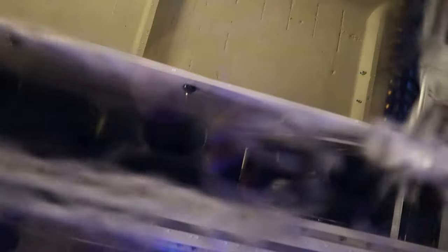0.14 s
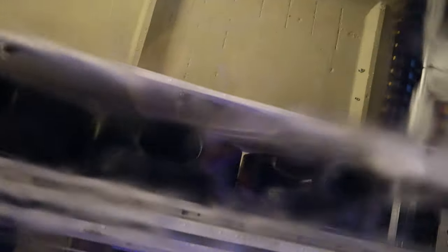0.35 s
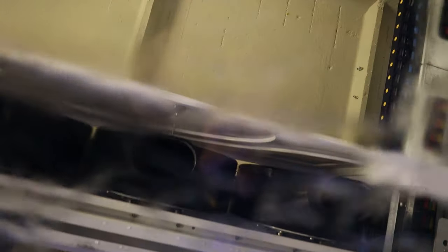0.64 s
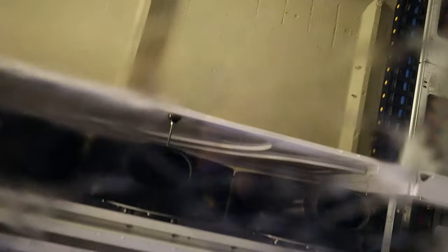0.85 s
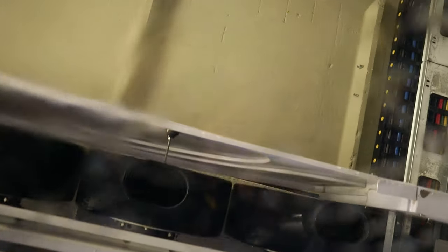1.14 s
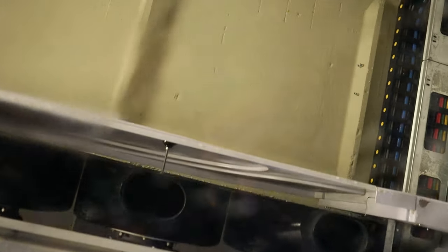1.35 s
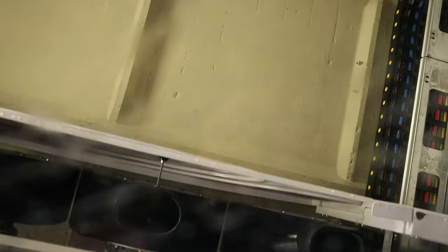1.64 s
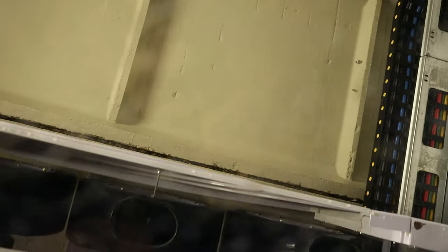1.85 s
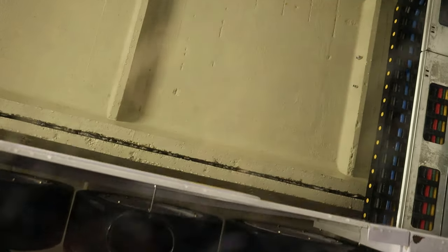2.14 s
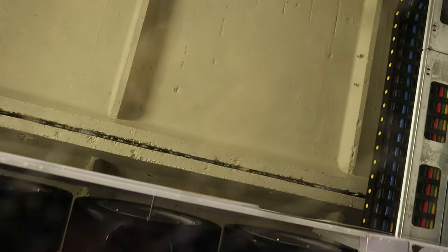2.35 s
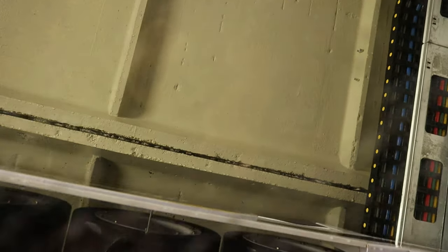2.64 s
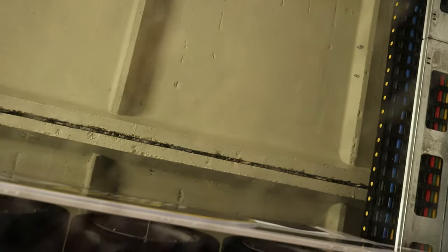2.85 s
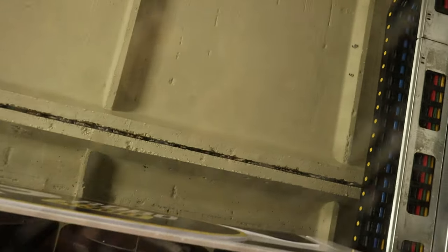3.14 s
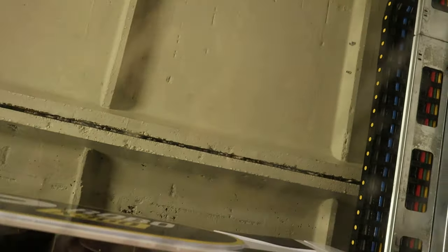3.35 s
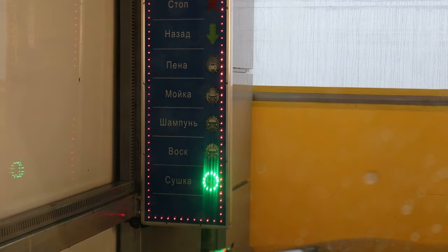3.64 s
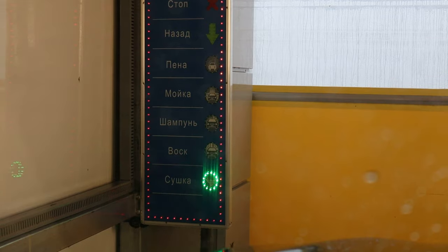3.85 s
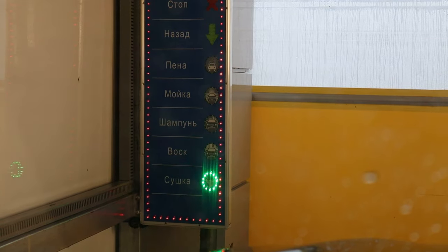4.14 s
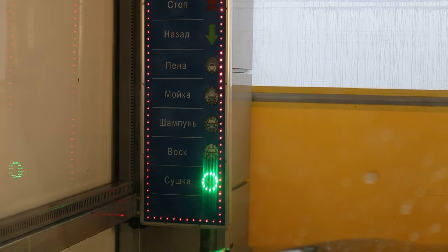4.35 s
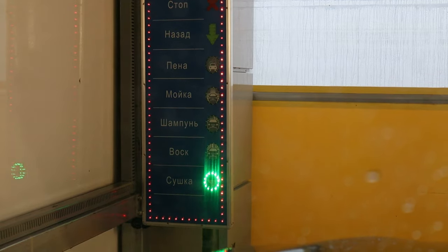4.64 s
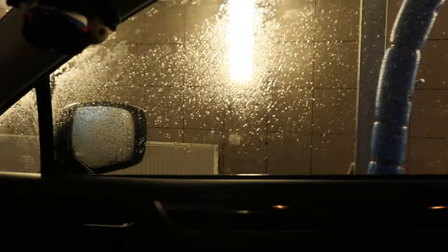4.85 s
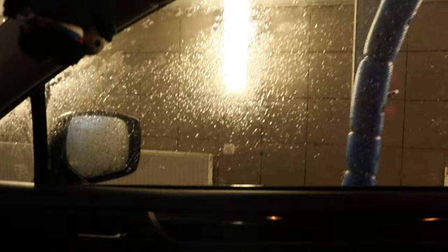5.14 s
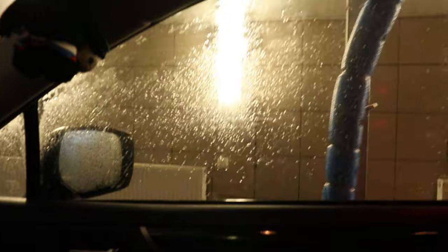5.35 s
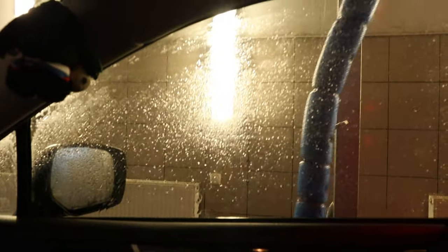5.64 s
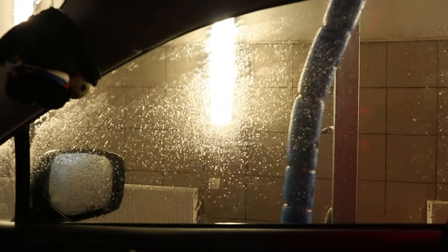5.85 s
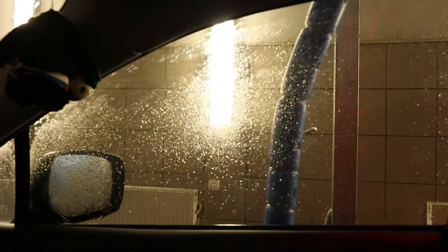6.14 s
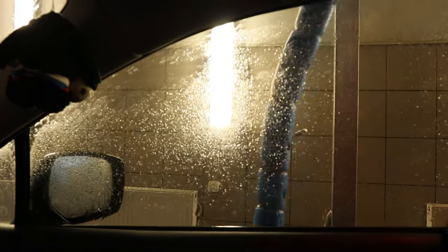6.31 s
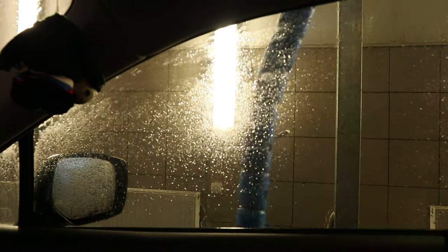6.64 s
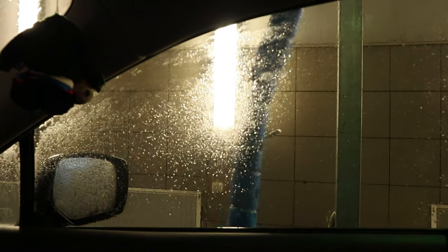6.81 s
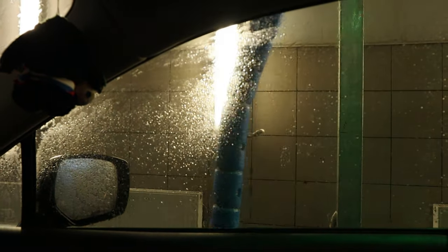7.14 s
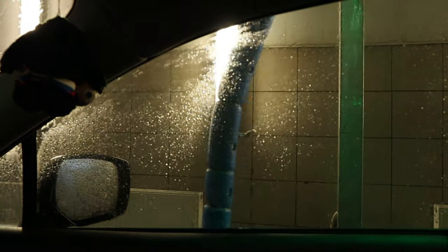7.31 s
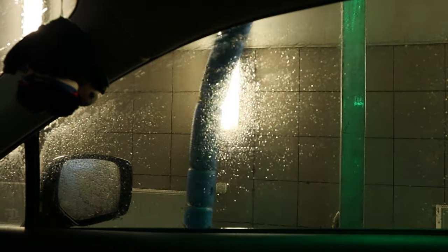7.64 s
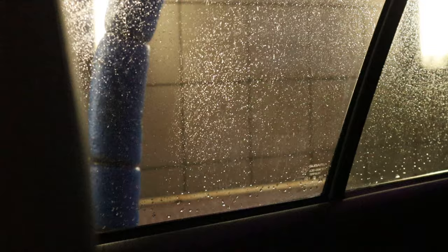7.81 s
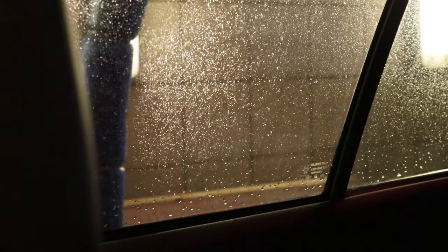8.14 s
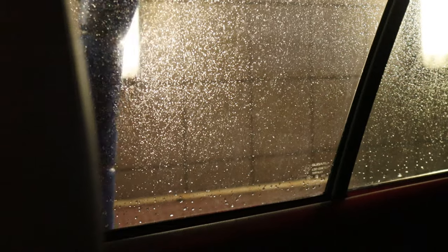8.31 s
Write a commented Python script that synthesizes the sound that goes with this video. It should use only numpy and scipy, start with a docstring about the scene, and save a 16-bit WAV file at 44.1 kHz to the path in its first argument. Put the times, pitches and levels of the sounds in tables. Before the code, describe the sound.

From 0 s, large car-wash dryers blow over a closed car, heard from within the cabin. A deep, turbulent boom dominates, slightly strongest at the very start, with a rumbling drone from roof, doors and glass. Above it lies a quiet, muffled hiss of air jets, a faint wavering fan whine near 2 kHz and soft, fuzzy whistles. Around 1.75 s the hiss grows briefly louder and duller; the lowest bass swells near 3.3 s. At about 4 s a very short fade moves to another seat, with similar roar but slightly different colour, and the hiss brightens gently around 4.7 s. The rush continues steadily, with small gusts, until 7.86 s, when it cuts with a click and a gap of about 0.02 s. The roar returns abruptly, with weaker deep boom and stronger panel and roof drone, a short bright hiss swell near 8.35 s, and continues to the end at about 8.5 s.

```python
"""Wash bay, microphone inside a car's cabin while large blowers dry it; heard from three seats in turn.
At the first seat turbulent air booms in the cabin modes and drones in roof, doors and glass, as shaped noise;
jet hiss (broad noise), a fan whine (wavering tone) and whistles (narrow noise) leak through the glass.
After 4 s this fades into the second seat; near 7.9 s that cuts off with a click and a short gap.
Then the third seat's boom and drone return at once, its hiss and the fan tones a little more slowly."""
import sys
import numpy as np
from scipy import signal
from scipy.io import wavfile
from scipy.ndimage import uniform_filter1d

SR = 44100
rng = np.random.default_rng(int(sys.argv[2]) if len(sys.argv) > 2 else 0)


def output_pcm(signal):
    """Save a mono or channel-first signal as 16-bit PCM at the path in sys.argv[1].

    Samples are clipped to [-1, 1] before scaling.
    """
    pcm = np.clip(np.atleast_2d(signal).T, -1, 1) * 32767
    wavfile.write(sys.argv[1], SR, np.round(pcm).astype(np.int16))


def to_linear_factor(level_db):
    """Convert decibel levels (scalar or array-like) to linear amplitude factors."""
    exponent = np.asarray(level_db, float) / 20
    return 10 ** exponent


N = 373527
T = np.arange(N) / SR  # time of every sample, s


def evened(x):
    """Scales to rms 1."""
    return x / np.sqrt(np.mean(x ** 2) + 1e-20)


def curve(rows):
    """Second column of a table at every sample, joined by straight lines over the times in the first."""
    rows = np.asarray(rows)
    return np.interp(T, rows[:, 0], rows[:, 1])


def ramp(start_s, end_s):
    """Rises from 0 to 1 between two times."""
    return np.clip((T - start_s) / max(end_s - start_s, 1e-4), 0, 1)


def bell(centre_s, width_s):
    """Rises to 1 at one moment and falls again."""
    return np.exp(-((T - centre_s) / width_s) ** 2)


def modes(table, seat):
    """Gain against frequency of steep resonances that add in power; widths lie between -6 dB points."""
    def gain(hz):
        power = 0
        for f, width, *db in table:
            offset = 2 * (hz - f) / width
            power = power + to_linear_factor(2 * db[seat]) / (1 + offset ** 2) ** 2
        return np.sqrt(power)
    return gain


def spectrum(points):
    """Gain against frequency from points joined on a log axis."""
    f, db = np.transpose(points)
    return lambda hz: to_linear_factor(np.interp(np.log(hz + 1), np.log(f + 1), db))


def turbulence(gain, size, patchy_db, gusty_db, tilt=None):
    """Noise of rms 1: random short-time spectra with drifting patches and gusts shared by all frequencies."""
    hop = size // 4
    frames, hz = N // hop + 5, np.fft.rfftfreq(size, 1 / SR)
    real, imaginary, patches = rng.standard_normal((frames, len(hz), 3)).T
    patches = evened(uniform_filter1d(uniform_filter1d(patches, 8, 0), 16, 1))
    starts = np.arange(frames) * hop
    gusts = 0
    for f in np.geomspace(3, 20, 24):
        gusts = gusts + np.sin(2 * np.pi * (f * starts / SR + rng.random())) / np.sqrt(f)
    # gusts show most in the treble
    field_db = patchy_db * patches + gusty_db * evened(gusts) * (1 + hz[:, None] / 7000)
    if tilt is not None:  # dB per octave, turning about 2 kHz
        octaves = np.log2((hz[:, None] + 1) / 2000)
        field_db += octaves * tilt[np.minimum(starts, N - 1)]
    z = (real + 1j * imaginary) * gain(hz)[:, None] * to_linear_factor(field_db)
    return evened(signal.istft(z, nperseg=size, noverlap=size - hop)[1][:N])


# air modes of the cabin: f/Hz, width/Hz, relative level/dB at seat 1, 2, 3
CABIN_MODES = [(50, 27, -10, -5, -14), (81, 40, -3, -8.5, -17.5), (112.2, 39.5, -2.5, -2.5, -7.5),
               (144, 30, -1.5, -3, -12.5), (177, 26.5, -6, -8.5, -11), (202.2, 37.6, -5.5, -10, -11)]
# cabin boom as the blowers travel: t/s, level/dB
BOOM_LEVEL = [(0, -15), (.15, -21), (.6, -20), (1.2, -22), (1.55, -19.5), (1.85, -22.5), (2.5, -21),
              (3.4, -23.5), (4, -23), (4.4, -24.5), (5.05, -24.5), (5.5, -23.5), (6.3, -23.5), (6.6, -22.5),
              (7.2, -24.5), (7.55, -22.5), (8.47, -22)]


def boom(seat):
    """The blast shakes the shell and the cabin air answers in its modes; the lowest swells once."""
    low_cut_hz = 38  # the microphone loses the deepest bass

    def heard(table):
        return lambda hz: modes(table, seat)(hz) / np.sqrt(1 + (low_cut_hz / (hz + 1)) ** 14)

    deep = turbulence(heard(CABIN_MODES[:1]), size=8192, patchy_db=0.0, gusty_db=0.5)
    swell = to_linear_factor(-29.5) * bell(centre_s=3.3, width_s=0.91)
    air = turbulence(heard(CABIN_MODES), size=8192, patchy_db=0.5, gusty_db=0.33)
    return swell * deep + to_linear_factor(curve(BOOM_LEVEL)) * air


# roof modes: f/Hz, width/Hz, relative level/dB at seat 1, 2, 3
ROOF_MODES = [(237, 73, -0.5, -5, -1.7), (302.5, 55, -4.5, -6, -4), (335.5, 27.2, -3, -1.5, -2.5)]
# door and glass modes: f/Hz, width/Hz, relative level/dB at seat 1, 2, 3
PANEL_MODES = [(396.7, 61, -1.5, -3, 0), (460.6, 45, -0.5, -1, -5), (527, 46, -3, -6, -8),
               (584.3, 47, -3, -6, -6.5), (655, 55, -9.5, -8, -9), (746, 124, -8.5, -10.5, -14.5)]
# one row a seat, also read by hiss(): middle t/s, roof drone level/dB, its drift/(dB per s),
# door and glass drone level/dB, its drift/(dB per s), hiss level/dB
SEAT_LEVELS = [(2, -31.5, -1.5, -40, 0.47, -45), (6, -32.5, -.5, -38, -0.5, -45.5),
               (8.2, -28, -1, -34.5, 4, -46)]


def drone(seat):
    """Eddies drum on the roof, and on doors and glass, which ring in their modes."""
    middle_s, roof_db, roof_drift, door_db, door_drift, _ = SEAT_LEVELS[seat]
    since = np.clip(T - middle_s, -3, 3)  # s
    settling_db = 6 * np.exp(-T / 0.077)  # the roof begins louder and settles
    roof = turbulence(modes(ROOF_MODES, seat), size=2048, patchy_db=-0.1, gusty_db=0.5)
    roof = to_linear_factor(roof_db + roof_drift * since + settling_db) * roof
    lowest = turbulence(modes(PANEL_MODES[:1], seat), size=2048, patchy_db=1.5, gusty_db=-0.5)
    swell = to_linear_factor(-42) * bell(centre_s=4.52, width_s=1)  # the lowest door mode swells once
    panels = turbulence(modes(PANEL_MODES, seat), size=2048, patchy_db=1.0, gusty_db=0.3)
    return roof + swell * lowest + to_linear_factor(door_db + door_drift * since) * panels


# hiss through the glass, one list a seat: f/Hz, relative level/dB
HISS_SPECTRA = [
    [(550, -44.5), (850, -5.5), (1100, -8), (1580, -11.5), (2300, -15.5), (3000, -15), (3800, -15.5),
     (4300, -19), (7200, -26.5), (8600, -37), (9500, -43.5), (11500, -48), (13500, -55), (15000, -68)],
    [(550, -52.5), (850, -1.5), (1100, -6), (1580, -9.5), (2100, -11.5), (2700, -16), (3200, -14.5),
     (3900, -16.5), (5000, -18), (5400, -23), (5950, -21), (6500, -24.5), (7300, -24.5), (8600, -34.5),
     (10000, -44), (12500, -52.5), (15000, -74)],
    [(550, -18), (850, 2), (1100, -1.5), (1580, -6.5), (2300, -9), (3100, -11), (3900, -10.5), (4450, -12),
     (4750, -16), (6500, -21), (7600, -26), (8800, -36), (10000, -42), (14500, -68)],
]
# change of the hiss tilt, one value a seat: drift/(dB per octave per s)
TILT_DRIFT = [0, -.1, 0]


def hiss(seat):
    """The jets' own noise, dulled by the glass; for a moment it is louder and duller."""
    middle_s, hiss_db = SEAT_LEVELS[seat][0], SEAT_LEVELS[seat][-1]
    dull = bell(centre_s=1.75, width_s=0.32)
    tilt = 0.4 + TILT_DRIFT[seat] * (T - middle_s) - 1.1 * dull  # dB per octave
    jets = turbulence(spectrum(HISS_SPECTRA[seat]), size=512, patchy_db=0.68, gusty_db=0.18, tilt=tilt)
    return to_linear_factor(hiss_db + 1.3 * dull) * jets


# blade tone of the nearest fan, before its flutter: t/s, level/dB
WHINE_LEVEL = [(0, -61), (.25, -65), (.8, -64), (1.1, -64), (1.22, -58), (1.35, -62), (1.6, -58.5),
               (1.8, -64), (1.95, -59), (2.15, -66), (2.3, -55.5), (2.42, -65), (2.55, -62), (2.7, -70),
               (3.05, -66), (3.23, -55), (3.4, -60), (3.62, -66), (3.82, -52), (3.93, -57), (4.1, -61),
               (4.25, -59), (4.35, -63), (4.5, -57), (4.6, -60), (4.72, -56), (4.85, -58), (4.97, -55),
               (5.05, -60), (5.15, -56), (5.28, -63), (5.75, -61), (5.85, -66), (5.95, -58), (6.15, -63),
               (6.27, -57), (6.45, -61), (6.75, -59.5), (6.87, -65), (7.05, -60), (7.3, -62), (7.45, -58),
               (7.55, -64), (7.7, -59), (7.85, -60), (7.9, -68), (8.12, -68), (8.22, -58), (8.47, -61)]


def whine():
    """Blades pass the housing; the moving air makes the tone waver in phase and level."""
    whine_hz, octave_db = 1966, -15  # blade tone, and its second harmonic against it
    phase_rad, flutter_db = 0.85, 2.0  # rms of the two waverings
    drift, flutter = (evened(uniform_filter1d(uniform_filter1d(v, size=1400), size=1400))
                      for v in rng.standard_normal((2, N)))
    phase = 2 * np.pi * whine_hz * T + phase_rad * drift
    tone = np.sin(phase) + to_linear_factor(octave_db) * np.sin(2 * phase)
    return np.sqrt(2) * to_linear_factor(curve(WHINE_LEVEL) + flutter_db * flutter) * tone


# fuzzy whistles of the other fans: f/Hz, width/Hz
WHISTLE_BANDS = [(1676, 11), (1728, 45), (2010, 60)]
# one peak for each whistle: peak t/s, level/dB, rise/(dB per s), fall/(dB per s)
WHISTLE_PEAK_LEVELS = [(.1, -62.5, 1, .8), (1.9, -61, 1.0, 1.8), (7.75, -57, 6, 60)]
# brief swells added to the middle whistle: t/s, width/s, level/dB
MIDDLE_SWELLS = [(.1, .15, 6), (.42, .05, 4), (.7, .1, 3), (1.1, .08, 5), (1.55, .1, 3), (1.88, .06, 8),
                 (2.55, .05, 3), (3.08, .08, 4), (3.52, .06, 3)]


def whistles():
    """Narrow noise where distant blades pass."""
    bands = [turbulence(modes([(hz, width, 0)], seat=0), size=16384, patchy_db=0, gusty_db=0)
             for hz, width in WHISTLE_BANDS]
    swell_db = sum(db * bell(s, width) for s, width, db in MIDDLE_SWELLS)
    bands[1] = bands[1] * to_linear_factor(swell_db)
    total = 0
    for (peak_s, db, rise, fall), band in zip(WHISTLE_PEAK_LEVELS, bands):
        below_peak_db = np.maximum(rise * (peak_s - T), fall * (T - peak_s))
        total = total + to_linear_factor(db - below_peak_db) * band
    return total


# bright band in the hiss: f/Hz, width/Hz, relative level/dB
BRIGHT_BAND = [(3900, 900, 2.5), (4640, 500, -3)]
# its two swells: t/s, width/s, level/dB
BRIGHT_LEVEL = [(4.7, 1, -59.5), (8.35, 0.27, -61.5)]


def bright():
    """The hiss brightens twice for a while, as a band of noise that swells."""
    level = sum(to_linear_factor(db) * bell(s, width) for s, width, db in BRIGHT_LEVEL)
    return level * turbulence(modes(BRIGHT_BAND, seat=0), size=512, patchy_db=-0.2, gusty_db=-0.5)


# thin top band over the hiss: f/Hz, width/Hz, relative level/dB
TOP_BAND = [(11000, 3500, 0)]
# its steady part: t/s, level/dB
TOP_CURVE = [(0, -84.5), (4, -84), (4.05, -95), (4.55, -95), (4.7, -83.5), (7.8, -82.5), (7.9, -100),
             (8.47, -100)]
# brief puffs added to it: t/s, width/s, level/dB
TOP_PUFFS = [(1.125, .012, -72), (1.17, .015, -80), (3.96, 0.037, -80.5), (7.23, .012, -77)]


def top():
    """The highest treble, a faint noise, wavers and now and then puffs."""
    puffs = sum(to_linear_factor(db) * bell(s, width) for s, width, db in TOP_PUFFS)
    level = to_linear_factor(curve(TOP_CURVE)) + puffs
    return level * turbulence(modes(TOP_BAND, seat=0), size=256, patchy_db=1.5, gusty_db=0.4)


# fade from the first seat to the second: start t/s, end t/s
SEAT_FADE = (3.995, 4.085)
# return of boom and drone at the third seat: start t/s, end t/s
BOOM_RETURN = (7.8825, 7.89)
# slower return of hiss and fan tones there: start t/s, end t/s
JETS_RETURN = (7.882, 7.895)


def scene():
    """The air at each seat, joined: a straight fade, then a hard cut on a wave crest and a quick return."""
    cut_s, crest = 7.86214, 0.09  # moment of the cut, and the sample value just before it
    first, second, third = (boom(seat) + drone(seat) for seat in range(3))
    first = first + hiss(seat=0)
    second = second + hiss(seat=1)
    jets = hiss(seat=2)
    shared = whine() + whistles() + bright() + top()  # the same at every seat
    fade, cut = ramp(*SEAT_FADE), round(cut_s * SR)
    before = (1 - fade) * first + fade * second + shared  # unrelated noises dip in the middle of the fade
    before += (crest - before[cut - 1]) * ramp(cut_s - 0.002, cut_s) ** 2  # bends up to the crest
    before[cut:] = 0
    after = ramp(*BOOM_RETURN) * third + ramp(*JETS_RETURN) ** 2.2 * (jets + shared)
    return (before + after)[None]


def top_cut(x):
    """Nothing passes above the cut-off."""
    return signal.sosfilt(signal.butter(12, 15500, fs=SR, output="sos"), x)


def record(dry):
    """Takes the finished mix as it stands at the microphone."""
    return top_cut(dry)


dry = scene()
out = record(dry)
output_pcm(out)
```